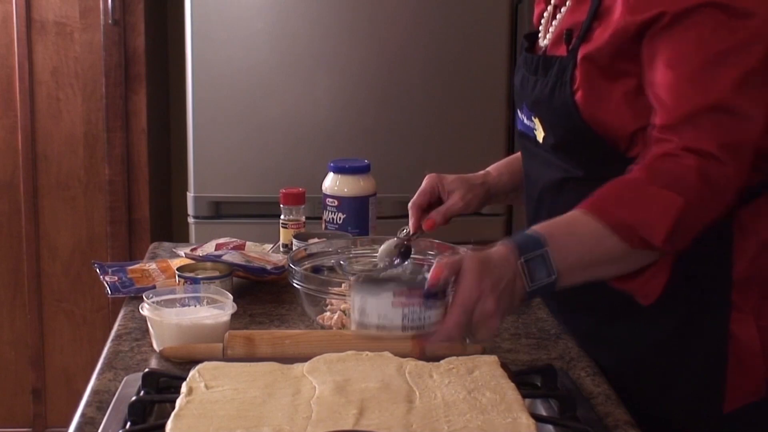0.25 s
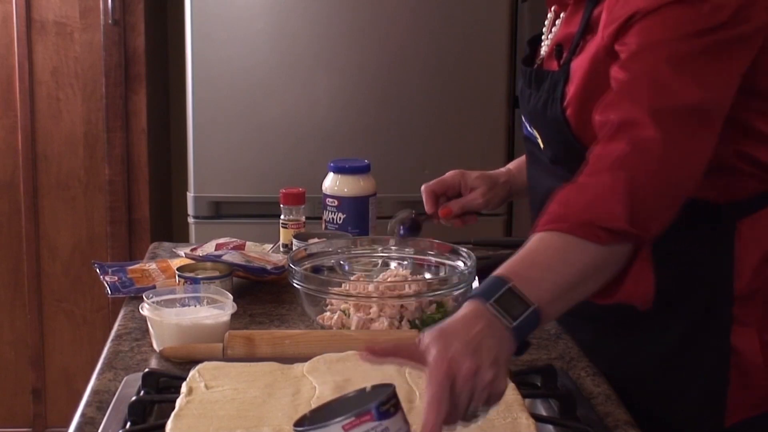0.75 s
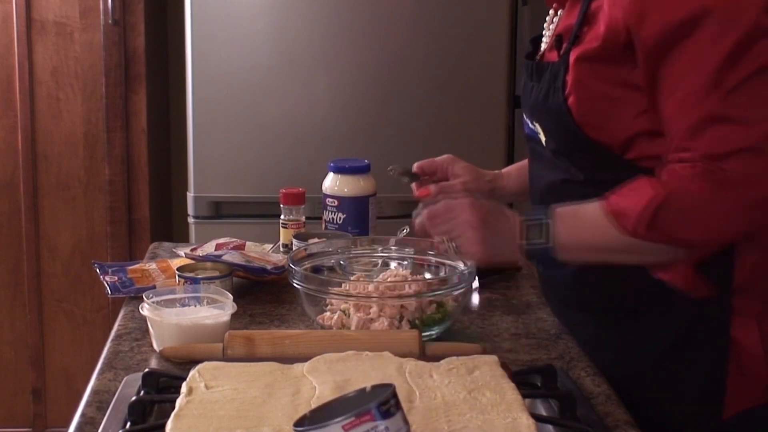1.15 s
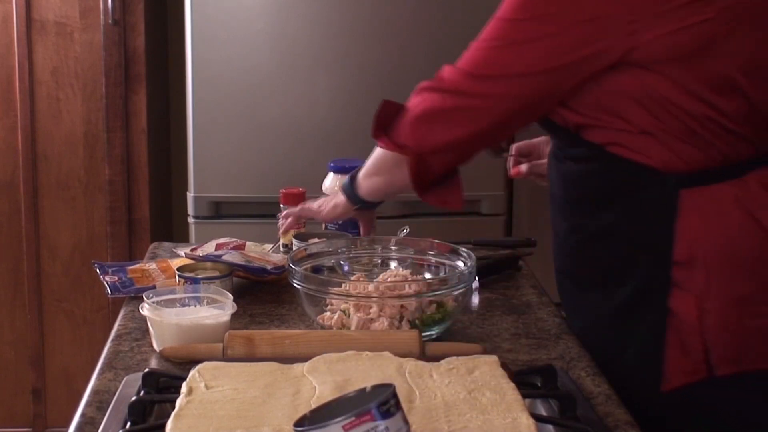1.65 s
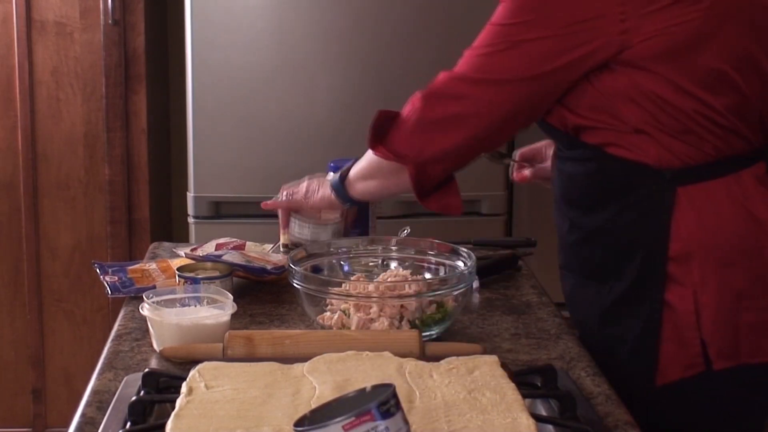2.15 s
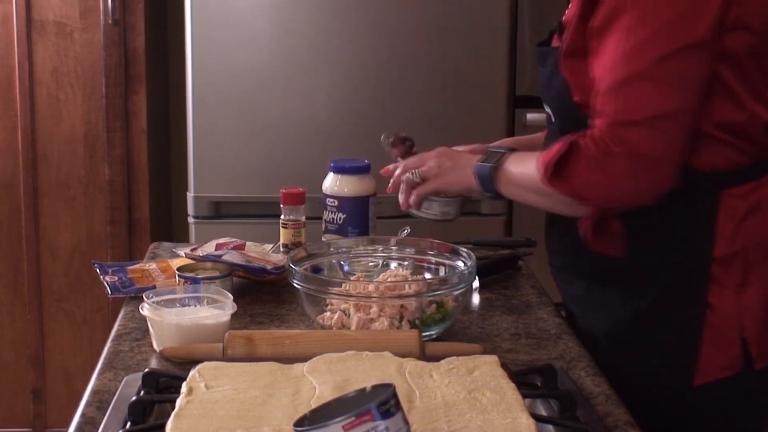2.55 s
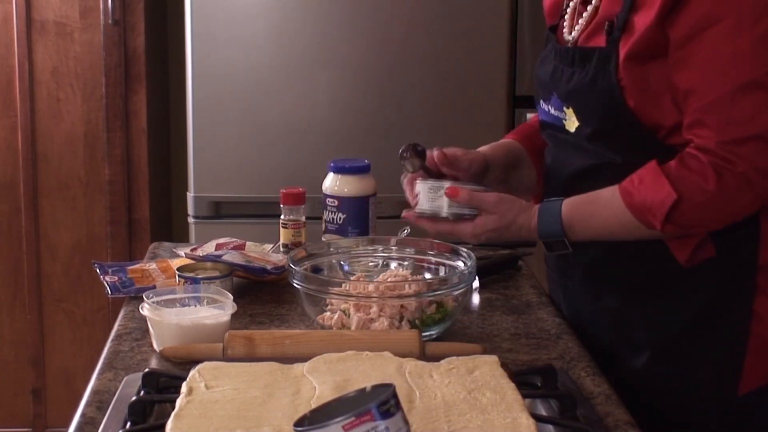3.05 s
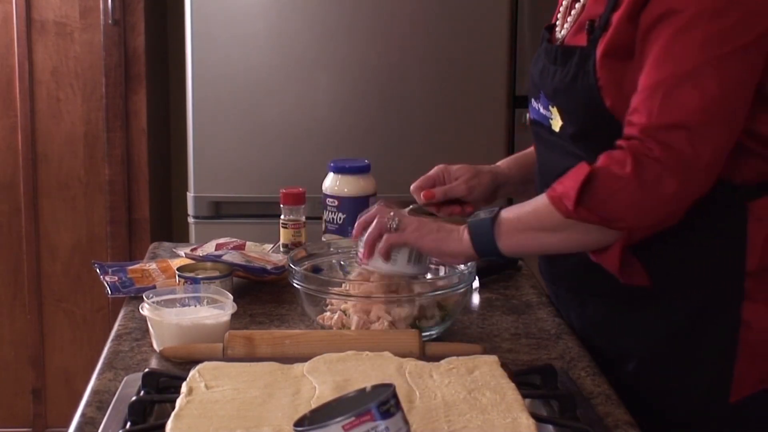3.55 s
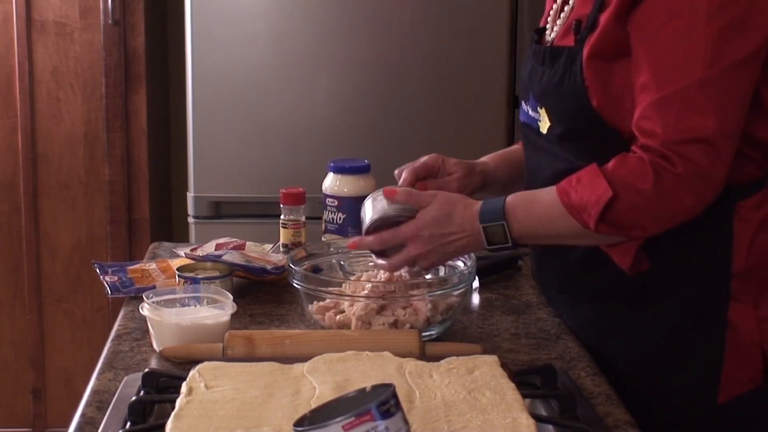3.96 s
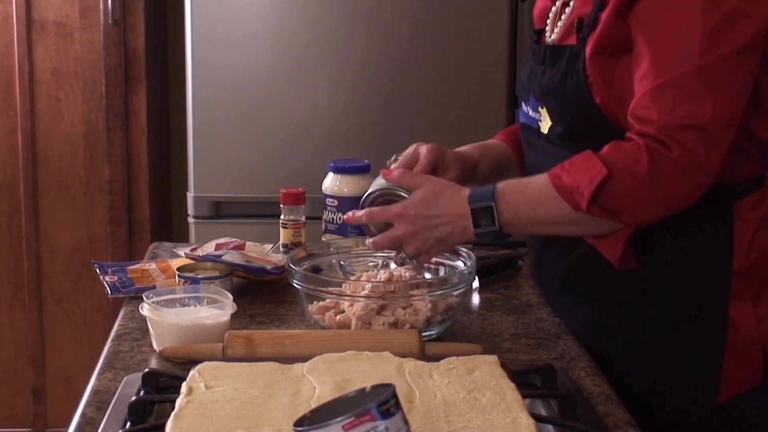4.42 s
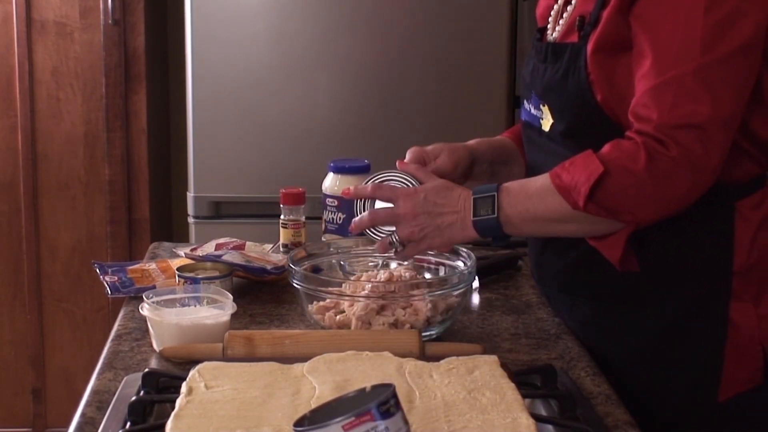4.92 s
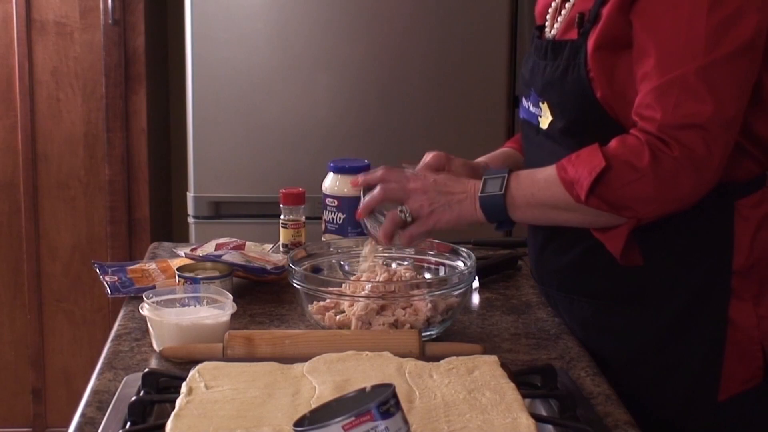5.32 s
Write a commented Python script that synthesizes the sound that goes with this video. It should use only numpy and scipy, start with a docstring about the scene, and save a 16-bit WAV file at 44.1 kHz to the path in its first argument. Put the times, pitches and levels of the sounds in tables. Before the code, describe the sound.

An empty tin clatters onto a stove grate, another rattles against glass, then a metal spoon taps, knocks and scrapes inside it.

```python
"""A small kitchen: a cook empties tins of chicken into a bowl, with a fridge humming behind.
An empty tin clatters down on the stove grate; a sleeve rustles and footsteps thud as the next tin is fetched.
That tin rattles against glassware; then a steel spoon ticks on its rim, knocks and scrapes inside.
Ringing modes make the metal and glass, shaped noise the snaps, cloth and thuds, sines the hum and squeaks;
a wall echo and a diffuse tail put the kitchen around the handled sounds."""
import sys
import numpy as np
from scipy import signal
from scipy.fft import rfft, irfft, next_fast_len
from scipy.io import wavfile
from scipy.ndimage import map_coordinates

SR = 44100
rng = np.random.default_rng(int(sys.argv[2]) if len(sys.argv) > 2 else 0)


def unload_wav(signal):
    """Save mono or channel-first audio to the path in sys.argv[1] as 16-bit WAV at rate SR, clipped to [-1, 1]."""
    wavfile.write(
        sys.argv[1],
        SR,
        np.round(np.clip(np.atleast_2d(signal).T, -1, 1) * 32767).astype(np.int16),
    )


N = 246254

# The spoon knocks inside the tin; spoon, meat and grip retune it: t/s, relative level/dB,
# brightness/(dB per octave), spot f/Hz, cavity f/Hz, bottom f/Hz, ring length/factor, buzz level/dB
SPOON_KNOCKS = [(4.2355, -37.5, 3, 1070, 447, 998, 1.1, -28),
                (4.702, -31, -3.2, 890, 418.5, 991, 1.27, -11), (4.712, -36, -1, 670, 434, 970, 0.55, -22),
                (5.0173, -28, -1.13, 1323, 458, 1177, 1, -5),
                (5.211, -34.5, 2.5, 4650, 434, 996, 0.79, -10.5),
                (5.233, -33, -1, 833, 524, 1005, 1.17, -7), (5.26, -40, 2.7, 535, 573, 1094, 1, 19),
                (5.498, -41.5, 1.7, 470, 410, 910, 1.7, -10.5), (5.506, -44, -.5, 605, 404, 790, 1.4, 4)]
# Balance of the held tin's registers, hollow, bottom, wall, rim, edge: level/dB
HELD_BALANCE_DB = [-1.4, -0.42, -0.9, 3.5, -0.33]
# Colour of the snap of hard metal contact, here and on rim and grate: f/Hz, level/dB
SNAP_COLOUR = [(100, -25), (400, -0.5), (2500, 4), (7000, 4), (11000, -4), (16000, -6)]
WALL_OVER_BOTTOM = 1.53  # pitch ratio of the tin's wall to its bottom


def spoon_in_tin():
    """The spoon digs in: a snap of noise and damped modes of the held tin, bent by the moving contact."""
    out = np.zeros(N)
    for s, db, brightness, spot_hz, cavity_hz, bottom_hz, ring_length, buzz_db in SPOON_KNOCKS:
        snap = amp(-1.5) * crack(SNAP_COLOUR, t60=0.013, buzz_db=buzz_db, buzz_t60=0.15)
        modes = held_tin(cavity_hz, bottom_hz, WALL_OVER_BOTTOM * bottom_hz, ring_length)
        blow = glide(ring(modes, scatter_db=1.5, detune=.005), depth=.015)
        knock = registers(blow + snap, db, brightness, HELD_BALANCE_DB, spot_hz)
        add(out, s, amp(-2) * knock)
    return out


# Fixed modes of the held tin with the spoon in it: f/Hz, level/dB, t60/s before the ring length
SPOON_TIN_MODES = [(657, -8.5, 0.071), (1772, -4.5, 0.05), (2352, -0.5, 0.046), (2572, -4, 0.057),
                   (3480, -4.5, 0.042), (3737, -2, 0.055), (5260, -10, 0.05), (5840, 1.5, 0.023),
                   (6400, -4, 0.051), (7050, -22, 0.035), (8700, -1, 0.017)]


def held_tin(cavity_hz, bottom_hz, wall_hz, ring_length):
    """Air cavity, drumming bottom and flexing wall join the fixed modes; a looser grip rings longer."""
    modes = [(cavity_hz, -1, .07), (bottom_hz, 6, .05), (wall_hz, 1, .05)] + list(SPOON_TIN_MODES)
    return [(hz, db, t60 * ring_length) for hz, db, t60 in modes]


# Spoon strokes along the wall:
# t/s, length/s, grit level/dB, tin resonance level/dB, easing of the pressure after the bite/dB
STROKES = [(4.27, .036, -48.5, -46.5, -3), (4.353, 0.072, -42, -44, 4), (4.425, .043, -43, -44.5, 1.5),
           (4.484, .018, -48.5, -53, -4), (4.524, 0.09, -35.5, -51.5, 19.5),
           (4.741, 0.066, -59, -61, -15.5), (4.797, 0.064, -36, -47, 4), (4.864, 0.043, -35.5, -47, 19),
           (5.258, 0.14, -39.5, -53, 14.5)]
# Colour of the crowd of high wall modes under the spoon: f/Hz, level/dB
GRIT_COLOUR = [(300, -23), (1600, -25), (2500, 0), (3400, -3.5), (4200, -6), (5600, 1), (8000, -1.5),
               (11000, -8), (16000, -11)]
STROKE_ATTACK_S, STROKE_RELEASE_S = 0.0035, 0.0071
BITE_S = 0.047  # the edge bites first, then the pressure settles with this time constant


def scrapes():
    """Irregular slips of the spoon's edge excite the tin's low modes and its crowd of high wall modes."""
    out = np.zeros(N)
    for s, length, grit_db, tin_db, easing_db in STROKES:
        size = int(length * SR)
        t = np.arange(size) / SR
        ends = np.clip(np.minimum(t / STROKE_ATTACK_S, (length - t) / STROKE_RELEASE_S), 0, 1)
        pressure = ends * amp(-easing_db * (1 - np.exp(-t / BITE_S)))
        sparse = (rng.random(size) < 1800 / SR) * rng.standard_normal(size)  # about 1800 slips a second
        slips = sparse + 0.16 * rng.standard_normal(size)
        slips *= pressure * amp(1.3 * wobble(233, size) + 2.2 * wobble(43, size))
        wall = coloured(rng.standard_normal(SR // 2) * fade(0.025), GRIT_COLOUR)
        body = ring(held_tin(434, 938, 1516, ring_length=1.0), scatter_db=-1, detune=0.043)
        for db, response in (grit_db, wall), (tin_db, body):
            sound = glide(signal.fftconvolve(slips, response), depth=0.01284)
            # The energy follows the pressure, whatever the response's own gain.
            add(out, s, amp(db) * sound * np.linalg.norm(pressure) / np.linalg.norm(sound))
    return out


# The spoon's edge catches and sings: t/s, starting f/Hz, level/dB
SQUEAKS = [(4.346, 1007, -44.5), (4.366, 1610, -47), (4.425, 1376, -49.5), (4.44, 1017, -43),
           (4.812, 1820, -47), (4.85, 4500, -44)]
SQUEAK_S = .036
SQUEAK_SAG = 0.059  # share of its pitch that a squeak loses over its length


def squeaks():
    """Where the slips lock onto a mode, the tin sings briefly as an unsteady sine and sags in pitch."""
    out = np.zeros(N)
    size = int(SQUEAK_S * SR)
    for s, hz, db in SQUEAKS:
        sag = np.linspace(1, 1 - SQUEAK_SAG, size)
        pitch = hz * sag * (1 + 0.0065 * wobble(350, size))
        tone = np.sin(2 * np.pi * np.cumsum(pitch) / SR)
        add(out, s, amp(db) * unit(np.hanning(size) * tone))
    return out


# The spoon taps the rim of the full tin:
# t/s, relative level/dB, brightness/(dB per octave), spot f/Hz, ring level/dB, loss per bounce/dB
RIM_TAPS = [(3.054, -42, 5.5, 3100, 5, 11.5), (3.168, -39.5, 1.5, 2210, -7, 31)]
# Modes of the full tin, short because meat and hand damp it: f/Hz, level/dB, t60/s
FULL_TIN_MODES = [(1335, -10, .025), (1690, -10, .03), (3470, -1, .028), (3720, 0, .02), (4020, 0, .018),
                  (4400, -3, .012), (4900, -3, .012), (5650, 3, .012), (6160, 3, .016), (7800, -11, .012),
                  (10800, -13, .012)]
# Balance of the five registers when the rim is tapped: level/dB
RIM_BALANCE_DB = [-0.35, 0, -1, 0.14, 1.2]
BOUNCE_S, BOUNCE_STRETCH = .03, 1.15  # first flight; the flights lengthen as the hand lifts


def spoon_on_rim():
    """The spoon lands three times per tap on the full tin, whose damped modes sound under a short snap."""
    out = np.zeros(N)
    for s, db, brightness, spot_hz, ring_db, loss_db in RIM_TAPS:
        for k in range(3):
            snap = crack(SNAP_COLOUR, t60=0.0055, buzz_db=-28, buzz_t60=0.091)
            blow = ring(FULL_TIN_MODES, scatter_db=2, detune=.012)
            mixed = amp(ring_db) * blow + snap
            tap = registers(mixed, db - k * loss_db, brightness, RIM_BALANCE_DB, spot_hz)
            add(out, s + BOUNCE_S * k ** BOUNCE_STRETCH, amp(-2.5) * tap)
    return out


# The empty tin rocks on the grate: t/s, relative level/dB, brightness/(dB per octave)
SET_DOWN = [(.569, -33.5, -0.5), (.607, -40, -3), (.66, -32.5, 1), (.712, -33, -1.5), (.746, -37, -0.5),
            (.755, -38, -4)]
# Modes of the empty tin, free to ring: f/Hz, level/dB, t60/s
EMPTY_TIN_MODES = [(440.5, -5.5, 0.31), (527, 0, 0.14), (809, -4.5, 0.34), (858.6, 2, 0.21),
                   (1061, -5, 0.19), (1188, -2.5, 0.24), (1244, 2, 0.33), (958, -2, 0.19), (690, -20, 0.28),
                   (1393, -6, 0.43), (1638, -3.5, 0.41), (2070, -7, 0.52), (2295, -5.5, 0.47),
                   (2352, 9, 0.12), (2865, 1.5, 0.17), (3444, 15.5, 0.033), (3600, 6, 0.13),
                   (4100, -26, .35), (5960, 4, 0.24), (7260, -10, .25)]
# Balance of the empty tin's five registers: level/dB
EMPTY_BALANCE_DB = [-5, -0.5, -3, 0.5, -4]
REBOUND_S = .014  # mean time to the second landing
REBOUND_LOSS_DB, REBOUND_DULLING = 6.5, 3.3  # the second landing is weaker, and duller in dB per octave


def empty_tin():
    """The empty tin rocks on the stove grate, buzzing and ringing freely; each contact rebounds once."""
    out = np.zeros(N)
    for s, db, brightness in SET_DOWN:
        for k in range(2):
            buzz = crack(SNAP_COLOUR, t60=0.016, buzz_db=-11.0, buzz_t60=0.21)
            blow = glide(ring(EMPTY_TIN_MODES, scatter_db=4, detune=.012), depth=.005)
            level, tilt = db - k * REBOUND_LOSS_DB, brightness - k * REBOUND_DULLING
            landing = registers(blow + buzz, level, tilt, EMPTY_BALANCE_DB)
            add(out, s + k * REBOUND_S * rng.uniform(.6, 1.4), landing)
    return out


GRATE_HZ, GRATE_DB = 210, -6  # level relative to the tin's contact


def grate():
    """The stove grate thuds under each contact of the empty tin: low noise around one pitch."""
    out = np.zeros(N)
    for s, db, _ in SET_DOWN:
        add(out, s, thud(db + GRATE_DB, GRATE_HZ, t60=0.28))
    return out


# A tin's hollow body clunks as it falls flat or comes free: t/s, relative level/dB, f/Hz
CLUNKS = [(.724, -28, 880), (.748, -23, 850), (2.114, -22.5, 770)]


def hollow_clunks():
    """The hollow body of a tin answers with a short puff of noise around its pitch."""
    out = np.zeros(N)
    for s, db, hz in CLUNKS:
        add(out, s, thud(db, hz, t60=0.086))
    return out


# Modes of the glass: f/Hz, level/dB, t60/s
GLASS_MODES = [(4103, -12, .3), (5426, 0, .25), (5515, -21, .15), (6490, -20, .45), (7381, -17, .4),
               (7425, -24, .25), (8865, -10, .3), (10540, -27, .25), (11225, -19, .18), (11290, -10, .22),
               (12508, -19, .3), (12812, -27, .3), (15162, -23, .18)]
# Modes of the tin knocking on it: f/Hz, level/dB, t60/s
RATTLE_MODES = [(490, -4, 0.047), (644, -0.5, 0.082), (945, -3, 0.025), (1287, 4, 0.077), (1707, -29, .07),
                (2270, 4, .08), (3010, -7.5, .12), (2980, -29, .1)]
# Colour of the noise of tin on glass: f/Hz, level/dB
RATTLE_COLOUR = [(60, -18), (160, 5.5), (600, 2.5), (2200, 3.5), (4000, -0.5), (8000, -12), (16000, -26)]
GRIP_S = 2.19  # the hand closes and stills the glass


def glassware():
    """The lifted tin chatters against glass; each touch keeps the same ring going at a new strength."""
    tin = np.zeros(N)
    t = np.arange(N) / SR
    swing = np.zeros((len(GLASS_MODES), N))  # amplitude of every glass mode over time
    hz, mode_db, t60 = np.transpose(GLASS_MODES)[:, :, None]
    for s, ring_db, rattle_db in glass_touches():
        share = amp(mode_db + 4.04 * rng.standard_normal(hz.shape))  # energy is divided anew at each touch
        touch = amp(ring_db + 1.5) * share / np.linalg.norm(share) * fade(t60)
        span = swing[:, round(s * SR):][:, :touch.shape[1]]
        span[:] = np.hypot(0.78 * span, touch)  # the contact also checks the old vibration
        body = ring(RATTLE_MODES, scatter_db=5.0, detune=0.065)
        rattle = amp(-6.0) * body + crack(RATTLE_COLOUR, t60=0.01, buzz_db=-9, buzz_t60=0.13)
        add(tin, s, amp(rattle_db - 0.5) * unit_attack(rattle))
    # Light grazing contact makes every mode flutter in level and phase.
    flutter, drift = np.array([[wobble(70, N), wobble(55, N)] for _ in GLASS_MODES]).transpose(1, 0, 2)
    tones = np.sin(2 * np.pi * (hz * t + rng.random(hz.shape)) + 0.34 * drift)
    glass = swing * amp(2.9 * flutter) * tones
    grip = amp(-8 * np.clip((t - GRIP_S) / 0.006, 0, 1))
    return grip * glass.sum(axis=0), tin


# The tin bumps the glass: t/s, relative glass ring level/dB, relative tin rattle level/dB
GLASS_HITS = [(1.997, -16, -24.5), (2.009, -33.5, -29), (2.051, -26.5, -31.5), (2.077, -17, -28),
              (2.114, -30, -26.5), (2.121, -22.5, -34), (2.164, -27, -34)]
CHATTER_PER_S, CHATTER_END_S = 42, 2.212
CHATTER_RING_DB, CHATTER_RATTLE_DB = -28, -37.5  # relative, as for the firm bumps


def glass_touches():
    """The firm bumps and the light, uneven chatter among them, in order of time."""
    times = np.arange(GLASS_HITS[0][0] + 1 / CHATTER_PER_S, CHATTER_END_S, 1 / CHATTER_PER_S)
    uneven = [s + rng.uniform(-.5, .5) / CHATTER_PER_S for s in times]
    chatter = [(s, CHATTER_RING_DB, CHATTER_RATTLE_DB) for s in uneven]
    return sorted(chatter + [tuple(hit) for hit in GLASS_HITS])


# Small wet clicks of meat and fingers on the tin: t/s, level/dB, f/Hz
TICKS = [(0.2735, -64, 12500), (2.728, -56, 12300), (2.851, -53.5, 6900), (3.8453, -67.5, 5830),
         (4.688, -58, 9100)]


def wet_clicks():
    """Meat and fingers click on the tin: very short puffs of noise around a high pitch."""
    out = np.zeros(N)
    for s, db, hz in TICKS:
        puff = band(rng.standard_normal(SR // 2) * fade(0.0068), hz / 1.53, hz * 1.2)
        add(out, s, amp(db) * unit_attack(puff))
    return out


# Dull bumps of body and tin: t/s, relative level/dB, f/Hz
BUMPS = [(.272, -43, 340), (1.502, -40, 220), (1.861, -38.5, 292.5), (2.672, -48.5, 700), (3.789, -49, 151)]
BUMP_CYCLES = 18  # bumps and heel thuds fall by 60 dB within this many cycles


def bumps():
    """Body and tin bump dully: puffs of noise that die faster the higher they sound."""
    out = np.zeros(N)
    for s, db, hz in BUMPS:
        add(out, s, thud(db, hz, BUMP_CYCLES / hz))
    return out


# Footsteps: t/s, relative level/dB
STEPS = [(1.352, -38), (1.557, -34.5)]
HEEL_HZ, FLOOR_HZ, FLOOR_DB, FLOOR_T60_S = 200, 55, -2, .22  # floor level is relative to the heel


def footsteps():
    """Each step is a heel thud over the lower, longer boom of the floor."""
    out = np.zeros(N)
    for s, db in STEPS:
        heel = thud(db, HEEL_HZ, BUMP_CYCLES / HEEL_HZ)
        floor = thud(db + FLOOR_DB, FLOOR_HZ, FLOOR_T60_S)
        add(out, s, heel + floor)
    return out


# Arm movements, each swelling and fading with the arm's speed: t/s, length/s, peak level/dB
SLEEVE = [(0, 0.25, -58), (0.182, 0.42, -62), (.98, .28, -61.5), (1.223, 0.89, -46.5), (1.949, 1.195, -53)]
# Colour of the cloth: f/Hz, level/dB
CLOTH_COLOUR = [(88, -32), (150, -4.5), (649, -9.5), (716, -13), (1080, -10.5), (2500, -18.5),
                (4860, -21.5), (10200, -27.5), (13200, -28), (16000, -34.5)]


def sleeve():
    """Cloth slides over the apron as the arm moves: coloured noise that follows the arm's speed."""
    speed = np.zeros(N)
    for s, length, db in SLEEVE:
        add(speed, s, amp(db) * np.hanning(int(length * SR)))
    return speed * amp(0.7 * wobble(50, N)) * coloured(rng.standard_normal(N), CLOTH_COLOUR)


# Lines of the fridge's hum: f/Hz, relative level/dB
HUM = [(80.7, -64.5), (118.4, -67), (161.5, -64), (823.6, -74.5), (1023, -72.5)]
# Colour of the room tone: f/Hz, level/dB
ROOM_TONE_COLOUR = [(12, -34), (20, -5), (74, -7), (168, -7.5), (222, -9.5), (241, -8), (357, -15),
                    (388, -11.5), (678, -18), (923, -20), (1000, -17), (1120, -24), (1570, -24.5),
                    (3070, -32.5), (16000, -46)]


def fridge():
    """Behind it all, the slightly unsteady sine lines of a compressor over coloured-noise room tone."""
    t = np.arange(N) / SR
    hum = sum(amp(db) * np.sqrt(2) * np.sin(2 * np.pi * hz * t + .5 * wobble(3, N)) for hz, db in HUM)
    return amp(-0.5) * hum + amp(-56.0) * coloured(rng.standard_normal(N), ROOM_TONE_COLOUR)


# Reverberation of the kitchen: f/Hz, t60/s
KITCHEN = [(150, 0.69), (1000, 0.63), (3000, 0.49), (7000, 0.46), (15000, 0.36)]


def kitchen(x, wall_db, wall_s):
    """A hard wall echoes once; the diffuse tail is decaying noise, drawn anew for each quarter second."""
    out = np.zeros(N)
    step = SR // 4
    for start in range(0, N, step):
        hz, t, z = signal.stft(rng.standard_normal(SR * 3 // 4), SR, nperseg=256)
        decay = np.exp(-np.log(1000) * t / along(KITCHEN, hz)[:, None])
        build_up = 1 - np.exp(-t / 0.0097)
        tail = signal.istft(z * decay * build_up, SR, nperseg=256)[1]
        add(out, start / SR, signal.fftconvolve(x[start:start + step], tail / np.linalg.norm(tail)))
    add(out, wall_s, amp(wall_db) * x)
    return out


# Edges of a tin's five registers, hollow, bottom, wall, rim, edge: f/Hz
REGISTER_EDGES = [330, 750, 1150, 2000, 4800, 15500]
SPOT_DB, SPOT_OCTAVES = 15, 0.49  # boost of the register under the contact, and its reach


def registers(blow, db, brightness, balance_db=(0, 0, 0, 0, 0), spot_hz=None):
    """A harder contact tilts the tin's registers toward the treble; the spot it lands on stands out."""
    lo, hi = np.array(REGISTER_EDGES[:-1]), np.array(REGISTER_EDGES[1:])
    octave = np.log2(lo * hi) / 2
    levels = db + np.array(balance_db) + brightness * (octave - np.median(octave))
    if spot_hz:
        levels = levels + SPOT_DB * np.exp(-((octave - np.log2(spot_hz)) / SPOT_OCTAVES) ** 2)
    return sum(amp(level) * unit_attack(band(blow, a, b)) for level, a, b in zip(levels, lo, hi))


def ring(modes, scatter_db, detune=0):
    """Modes struck at a new spot; pressure on thin metal shifts their pitch."""
    t = np.arange(SR // 2) / SR
    chance = rng.standard_normal((len(modes), 3))
    total = np.zeros(SR // 2)
    for (hz, db, t60), (level, shift, phase) in zip(modes, chance):
        tone = np.sin(2 * np.pi * (hz * (1 + detune * shift) * t + phase))
        total += amp(db + scatter_db * level) * fade(t60) * tone
    return unit_attack(total)


def crack(spectrum, t60, buzz_db, buzz_t60):
    """The noise of a contact: a sharp snap, then the buzz of loose metal."""
    envelope = fade(t60) + amp(buzz_db) * fade(buzz_t60)
    return unit_attack(coloured(rng.standard_normal(SR // 2), spectrum) * envelope)


def glide(x, depth):
    """A moving contact bends the pitch of the thin metal: x is read at an unsteady speed."""
    position = np.cumsum(1 + depth * wobble(40.3, len(x)))
    return map_coordinates(x, [position], order=3)


def thud(db, hz, t60):
    """A dull puff of noise around one pitch, peaking 2.5 dB above db."""
    x = band(rng.standard_normal(SR // 2) * fade(t60), hz / 1.964, hz * 1.45)
    return amp(db + 2.5) * x / np.abs(x).max()


def amp(db):
    """Decibels to amplitude."""
    return 10 ** (np.asarray(db) / 20)


def unit(x):
    """Scale x to rms 1."""
    return x / np.sqrt(np.mean(x ** 2) + 1e-20)


def unit_attack(x):
    """Scale a blow to rms 1 over its first hundredth of a second."""
    return x / np.sqrt(np.mean(x[:SR // 100] ** 2) + 1e-20)


def along(points, hz):
    """Interpolate (Hz, value) points on a log frequency axis."""
    f, v = np.transpose(points)
    return np.interp(np.log(hz + 1), np.log(f + 1), v)


def add(track, s, x):
    """Mix x into the track from time s."""
    part = track[max(round(s * SR), 0):][:len(x)]
    part += x[:len(part)]


def coloured(x, spectrum):
    """x through a (Hz, dB) colour, at rms 1."""
    gain = amp(along(spectrum, np.fft.rfftfreq(len(x), 1 / SR)))
    return unit(irfft(rfft(x) * gain, len(x)))


def band(x, lo, hi):
    """Causal band-pass."""
    return signal.sosfilt(signal.butter(3, [lo, min(hi, .49 * SR)], "band", fs=SR, output="sos"), x)


def wobble(rate, size):
    """A smooth random curve, rate knots a second."""
    knots = rng.standard_normal(int(size * rate / SR) + 4)
    return map_coordinates(knots, [np.arange(size) * rate / SR])


def fade(t60):
    """Half a second of exponential decay, falling 60 dB in t60 seconds."""
    return np.exp(-np.log(1000) * np.arange(SR // 2) / SR / t60)


def scene():
    """Direct sound of every source, plus the kitchen's answer to all but cloth and fridge."""
    stove, rim = empty_tin(), spoon_on_rim()
    glass, rattle = glassware()
    spoon = spoon_in_tin() + scrapes() + squeaks()
    small = wet_clicks() + footsteps() + bumps() + grate() + hollow_clunks()
    sent = amp(-11.5) * stove + amp(-36) * glass + amp(-8) * rattle
    sent += amp(-18.0) * rim + amp(-14) * (spoon + small)
    room = kitchen(sent, wall_db=-8.5, wall_s=0.03)
    return (stove + glass + rattle + rim + spoon + small + room + sleeve() + fridge())[None]


TOP_HZ = 16000


def record(dry):
    """The microphone channel falls away steeply above its band limit, 1 dB every 15 Hz."""
    size = next_fast_len(N + SR // 2)
    hz = np.fft.rfftfreq(size, 1 / SR)
    gain = amp(-np.logaddexp(0, (hz - TOP_HZ) / 15))
    return irfft(rfft(dry, size) * gain, size)[:, :N]


dry = scene()
out = record(dry)
unload_wav(out)
```